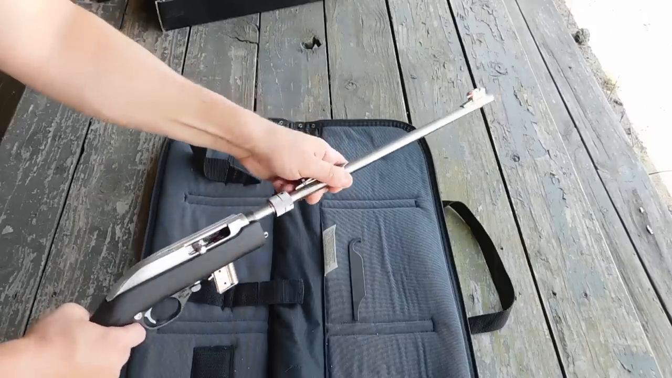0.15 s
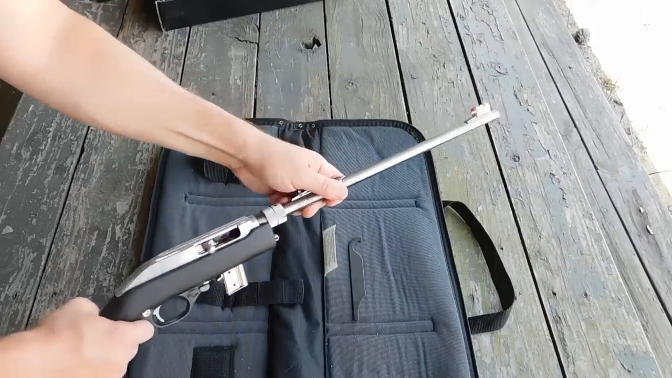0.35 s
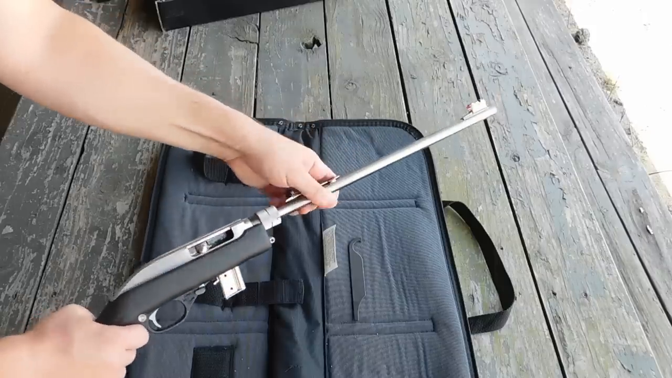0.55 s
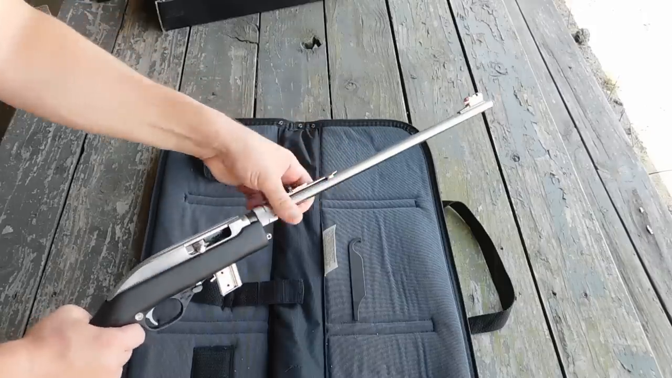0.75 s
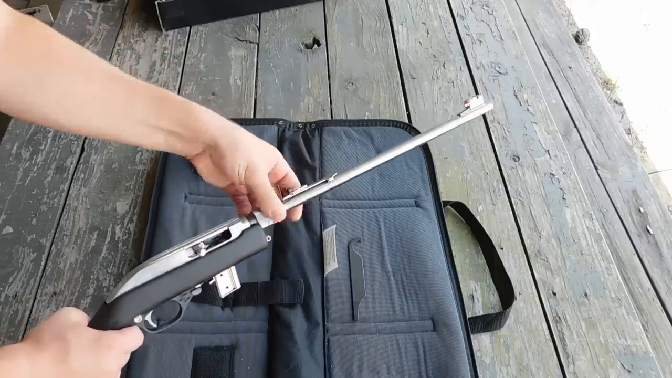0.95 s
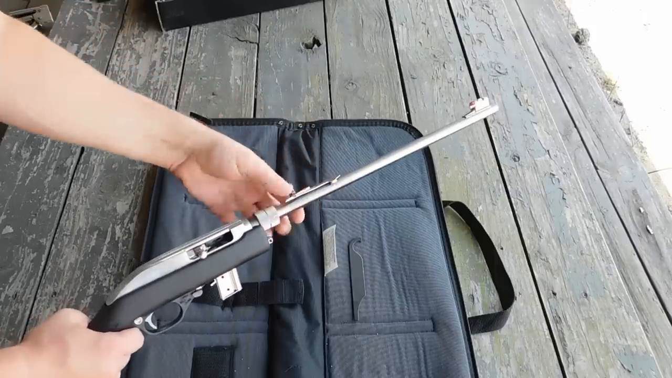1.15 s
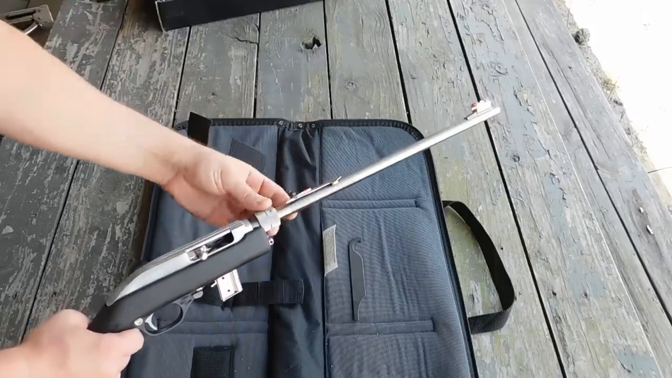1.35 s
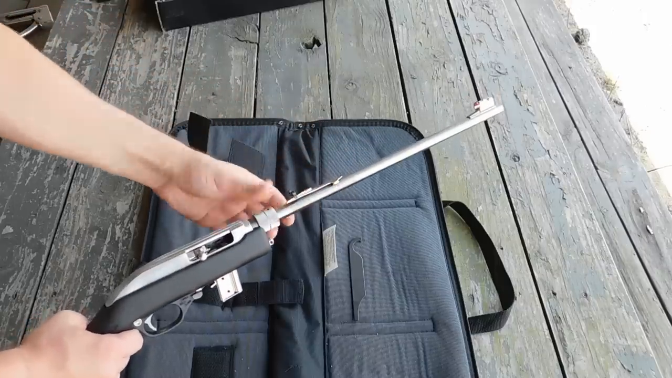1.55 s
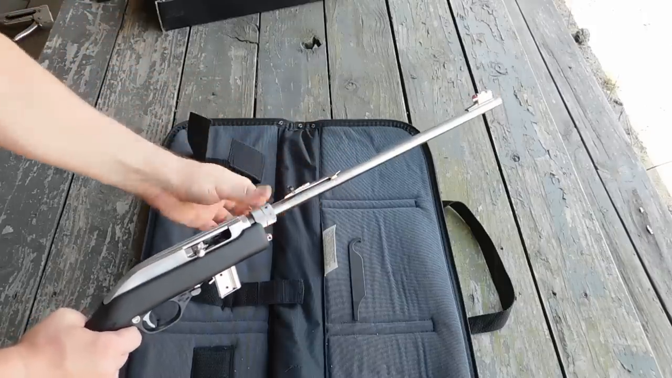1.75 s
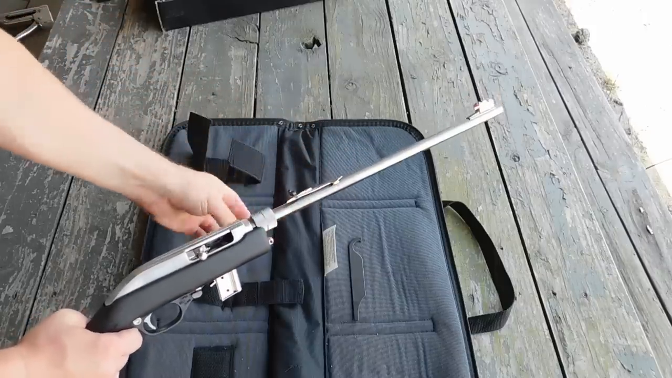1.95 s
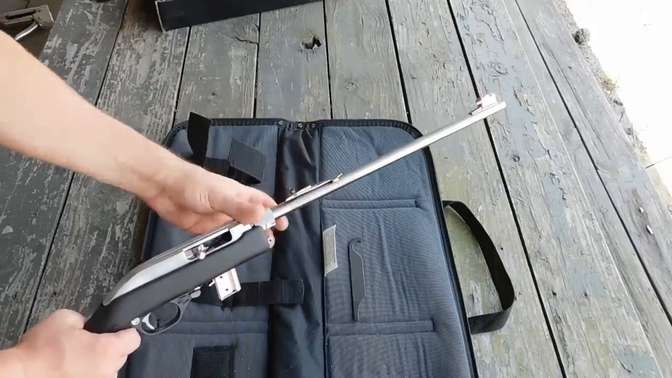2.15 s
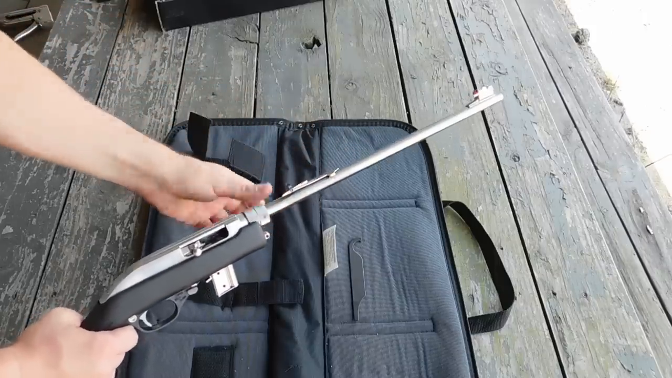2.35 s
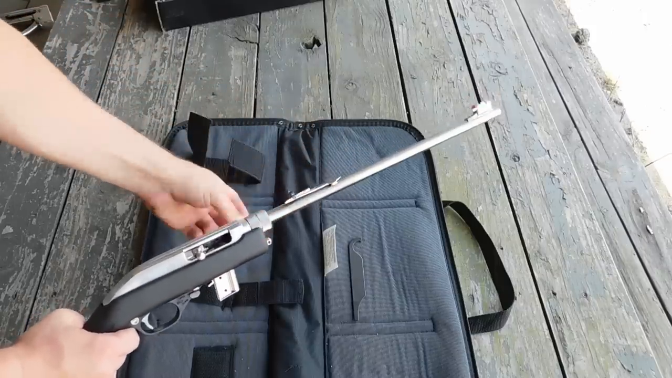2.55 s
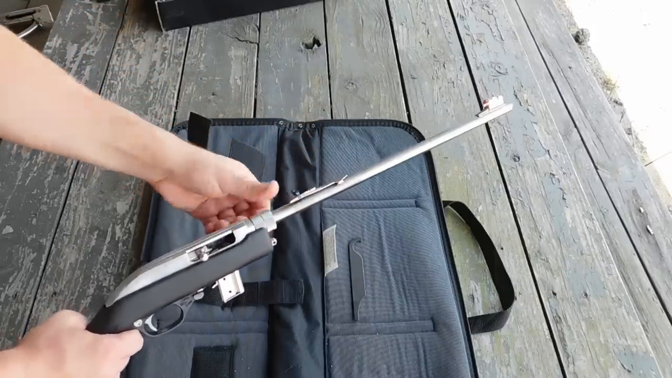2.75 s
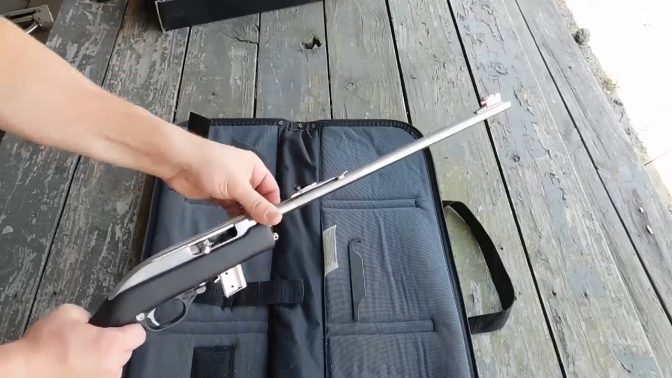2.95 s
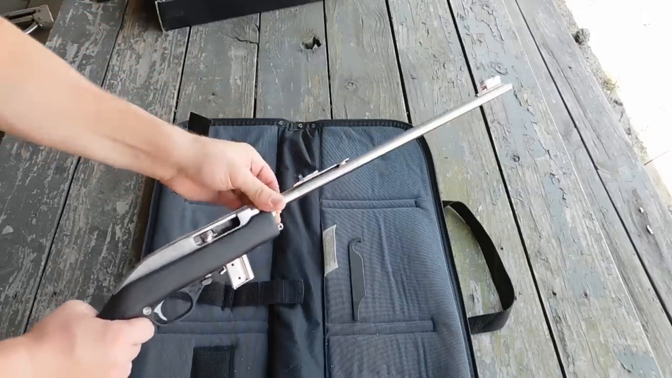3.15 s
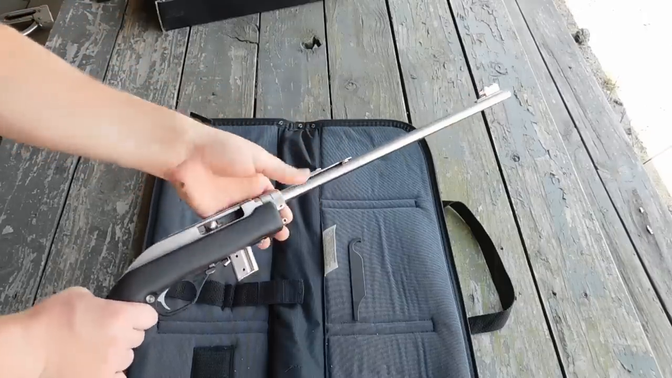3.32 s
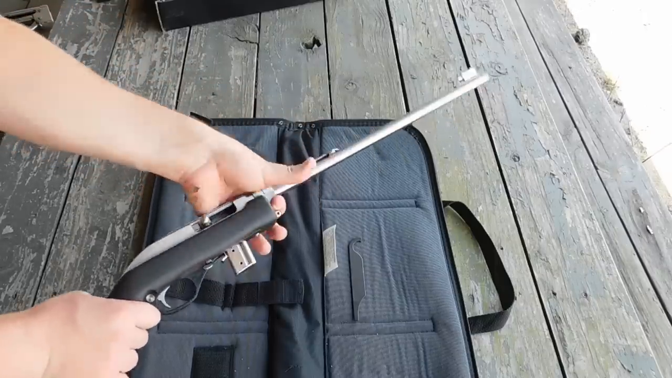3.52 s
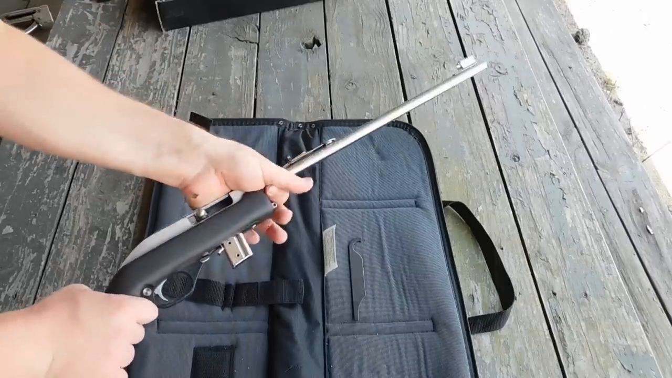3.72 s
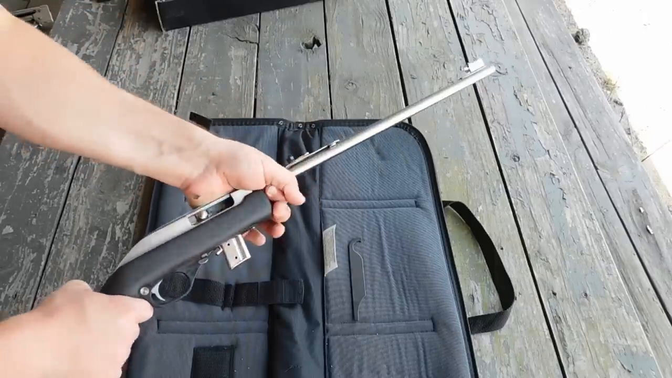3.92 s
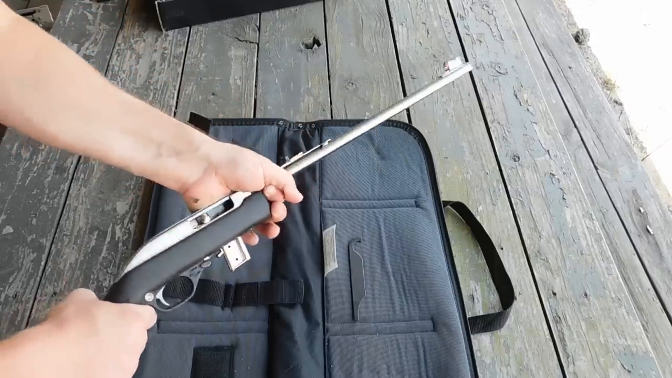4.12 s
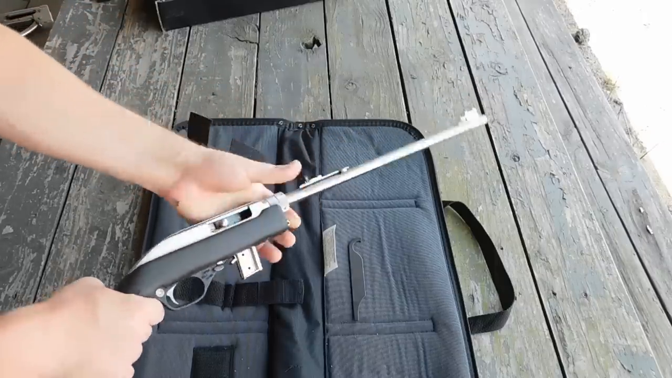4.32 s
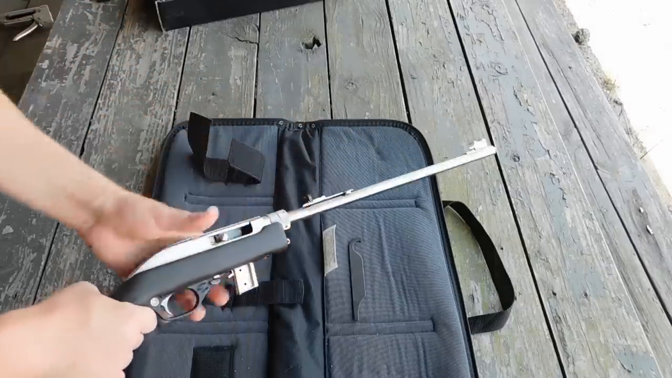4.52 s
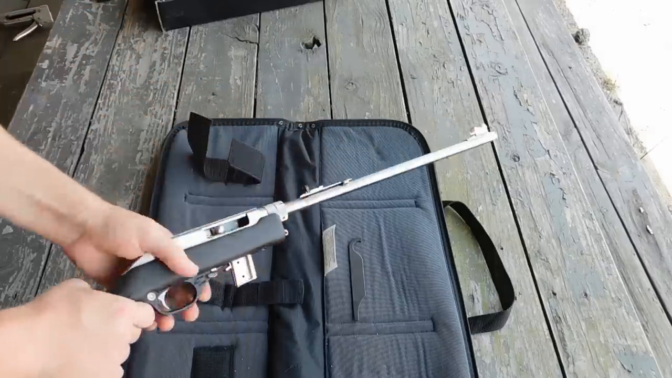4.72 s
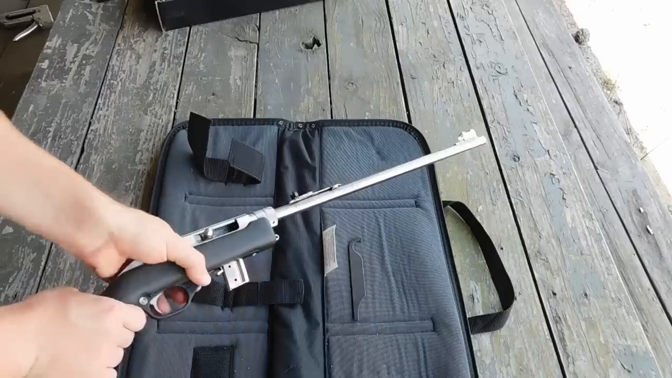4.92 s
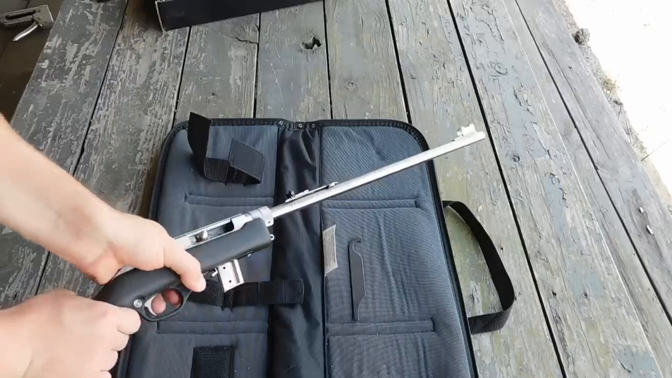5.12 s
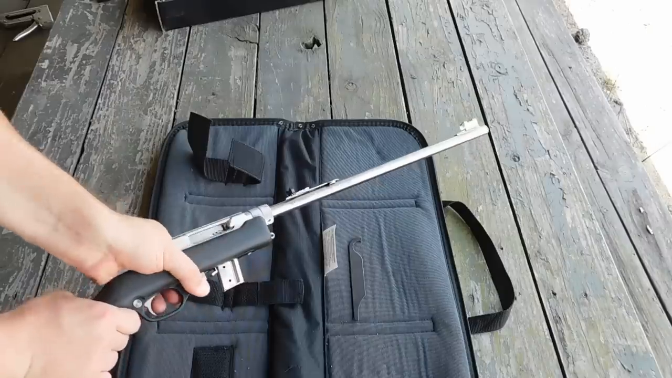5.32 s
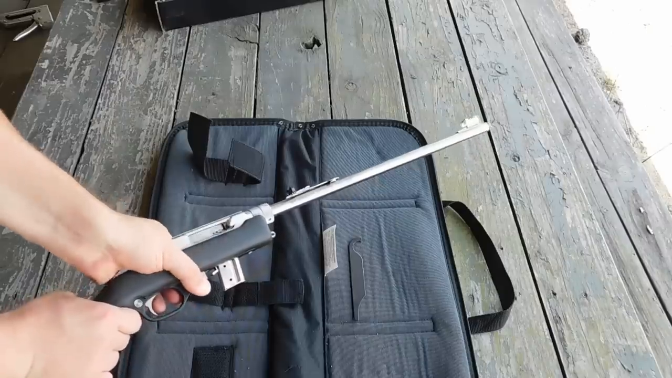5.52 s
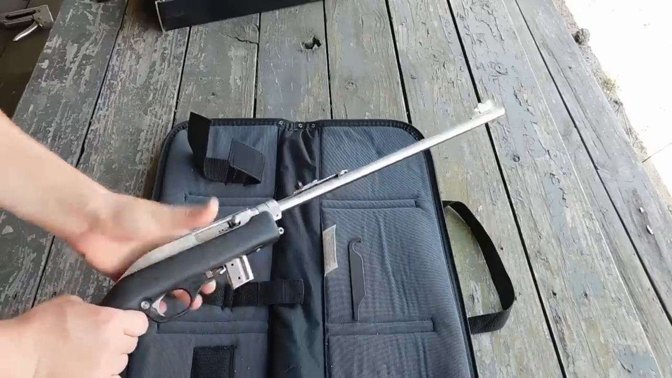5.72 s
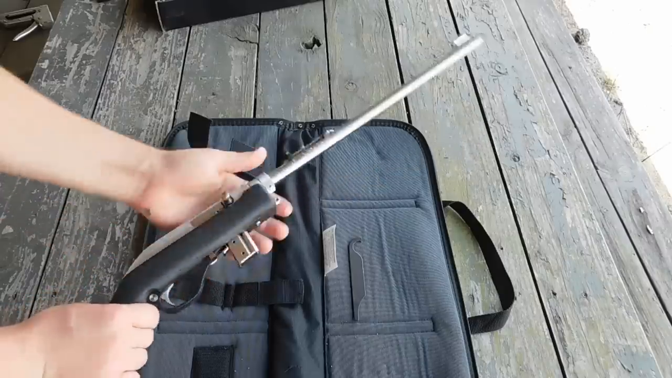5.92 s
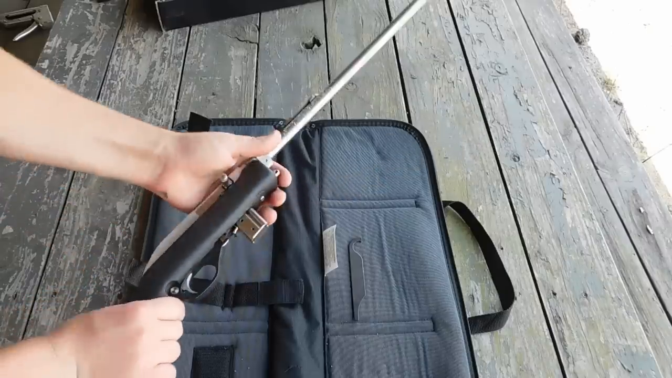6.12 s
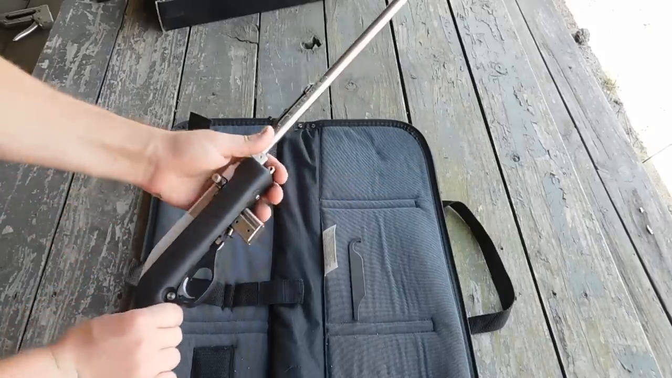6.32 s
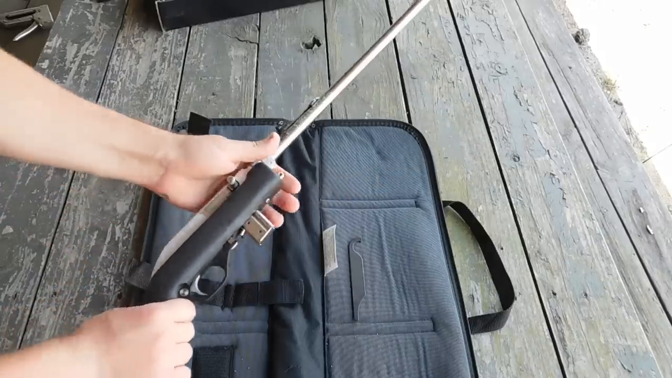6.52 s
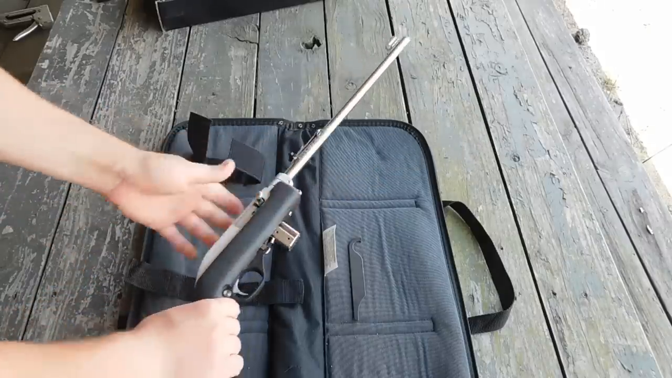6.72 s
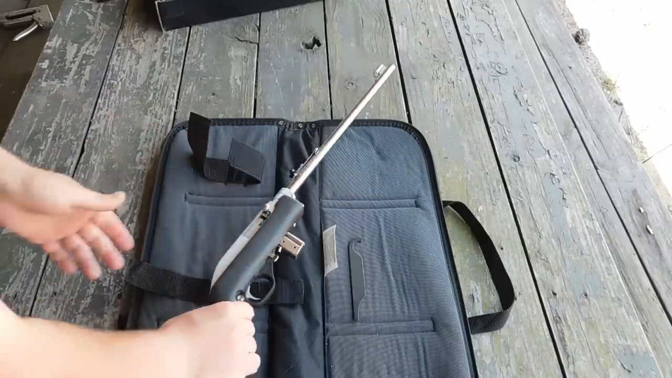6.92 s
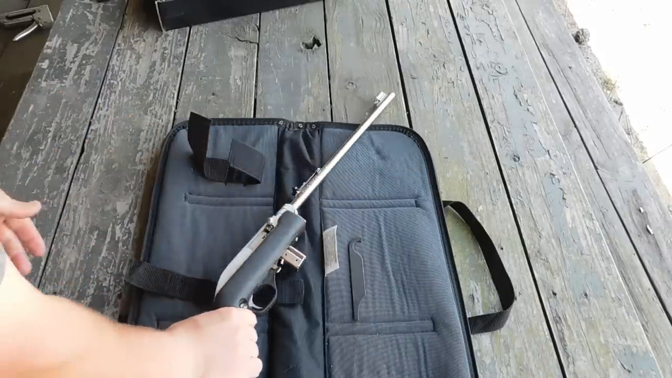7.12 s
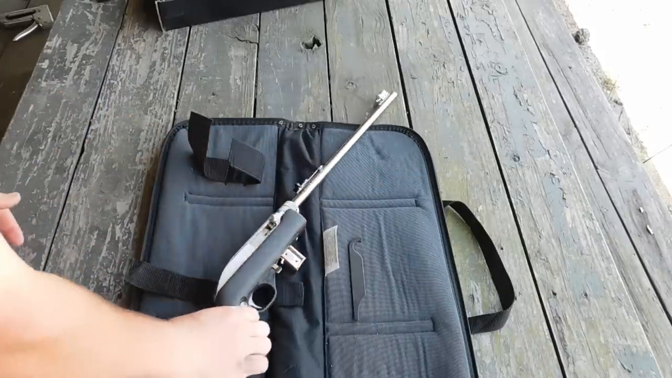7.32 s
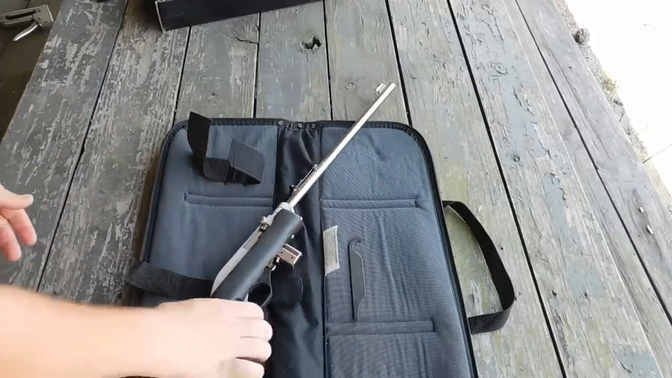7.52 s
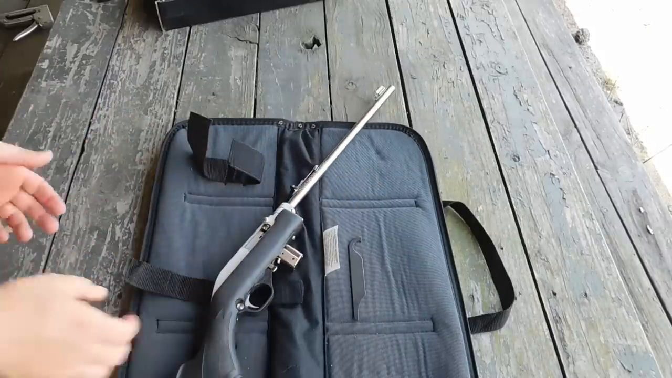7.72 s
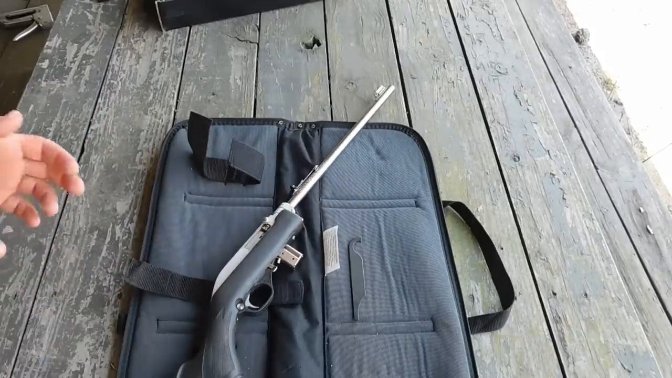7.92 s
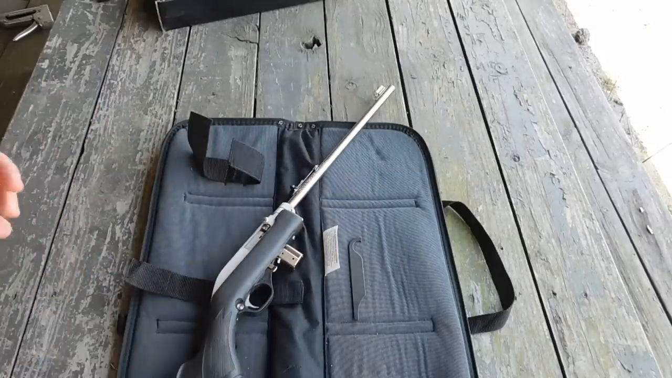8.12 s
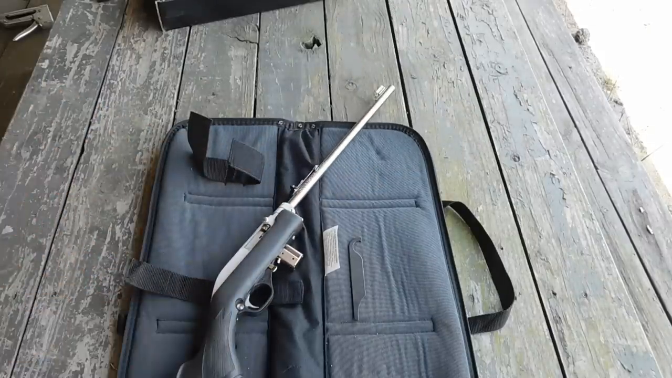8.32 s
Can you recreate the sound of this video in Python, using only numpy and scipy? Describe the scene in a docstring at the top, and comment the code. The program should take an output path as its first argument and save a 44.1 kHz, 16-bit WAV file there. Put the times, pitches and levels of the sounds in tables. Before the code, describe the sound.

A rifle is assembled with two sharp metal clacks, light clicks and scrapes, then laid softly on a padded case outdoors.

```python
"""Assembling a takedown rifle on a wooden porch.

The barrel slides home, its nut is spun and locked, the bolt slams shut, and the rifle is laid on a
padded case. Impacts excite the modes of the steel and of the hollow body; friction makes the sliding
parts and the fabric hiss. The porch reverberates briefly, and an insect trills in the quiet air."""
import sys
import numpy as np
from scipy import signal
from scipy.fft import rfft, irfft, next_fast_len
from scipy.io import wavfile
from scipy.ndimage import uniform_filter1d

SR = 44100
rng = np.random.default_rng(int(sys.argv[2]) if len(sys.argv) > 2 else 0)


def int16_out(signal):
    """Quantize to a 16-bit WAV file."""
    q = np.round(np.clip(np.atleast_2d(signal).T, -1, 1) * 32767)
    wavfile.write(sys.argv[1], SR, q.astype(np.int16))


N = 368676

# spectrum of sliding friction: (f/Hz, relative level/dB)
FRICTION_SPECTRUM = [(150, -20.5), (600, -8.5), (1300, -1), (2300, -2), (3700, -6), (5000, -12),
                     (8000, -20.5), (16000, -22)]
# stereo width of the rifle's sounds: (f/Hz, side over mid/dB)
RIFLE_WIDTH = [(40, -8), (150, -6), (400, -10), (1000, -9), (2500, -7.5), (4000, -3.5), (8000, -2.5),
               (14000, -3)]
# stereo width of the background: (f/Hz, side over mid/dB)
BACKGROUND_WIDTH = [(60, -5), (150, -1), (380, -0.5), (950, 0), (2380, -1), (5980, 0.5), (15000, 0.5)]


def steel_clacks(rebound_s=.0069, ring_q=5.5, hard_above_db=-20, pan_db=2):
    """Impact excitation: a contact and two rebounds drive dense, short modes; the barrel rings on."""
    # steel meeting steel: (t/s, level/dB, resonance f/Hz, resonance over crack/dB,
    # tilt/dB per octave, change per rebound/dB, relative barrel level/dB)
    impacts = [ (0.1217, -39.5, 1700, 0, -4, -6, -22), (0.2881, -6.5, 1695, -6, 1, -13.5, -33),
               (0.314, -24, 3493, -9, 3.5, -9, -5), (0.6591, -40, 3640, -14.5, 1, -9.5, -9),
               (0.6845, -46, 3620, -14, -4, -12, -11), (0.956, -50, 2300, 0.5, -0.5, -15.5, -18),
               (1.054, -42, 1540, 0, 1.5, -1, 1.5), (1.086, -37, 2190, -4, 1, -9.5, -5),
               (1.147, -33, 3800, -4, 2, -16, -5), (1.314, -29.5, 3600, -6, 1, -1.5, -1.5),
               (1.4064, -43, 1460, 11, 3.5, -12, -5), (1.748, -49, 1500, -10, -6, -8, -13.5),
               (1.955, -40.5, 2230, 1, -2.5, -8.5, -15), (2.5132, -50.5, 1340, -1.5, -6.5, -9, -13),
               (2.595, -24, 1430, 4, -1.5, -17.5, -15), (3.2545, -53, 654, -4, -2.5, -1, -25),
               (3.5677, -52, 2220, -8, 1, -10.5, -25), (3.6265, -53, 2150, 5, -2.5, -8, -22),
               (5.236, -54, 2420, -19, 4, -8.5, -13), (5.3698, -6, 3970, -0.5, 4, -6, -26),
               (5.384, -20, 4000, 3.5, 6, -7.5, -24), (5.6582, -42.5, 2550, 0, 2.5, -6.5, -29),
               (6.015, -45.5, 2340, -11, 0.5, -7, -11), (7.124, -48, 2306, -5, -5.5, -14, -30)]
    # spectrum of the crack: (f/Hz, relative level/dB)
    crack_spectrum = [(100, -35.5), (400, -17), (750, -5.5), (1000, -7), (1350, 0.5), (2000, -2),
                      (3000, -5), (3800, -5.5), (4700, -10.5), (6000, -9.5), (9000, -14), (13000, -19.5),
                      (16000, -26)]
    # modes of the barrel: (f/Hz, relative level/dB, T60/s)
    barrel_modes = [(1697, -7.5, 0.086), (1900, -12, .12), (2280, -7, .16), (3620, -1.5, 0.066),
                    (3749, -7, 0.13), (5330, -14.5, .09), (5360, -13, 0.15), (15260, -4.5, .12)]
    out, t, brief = np.zeros((2, N)), np.arange(SR // 4) / SR, np.arange(2048) / SR
    for s, db, ring_hz, ring_db, tilt_db, rebound_db, barrel_db in impacts:
        # a gentler touch lasts longer, so it has less treble
        corner_hz = min(20000 * 2 ** (db / 25.5), .45 * SR)
        softness = signal.butter(2, corner_hz, fs=SR, output="sos")
        for bounce in range(3):
            if bounce == 0 and db > hard_above_db:
                contact = contact_burst(brief, t60=.013)
            else:  # a light touch grazes first
                contact = contact_burst(brief, t60=.031) * (1 - np.exp(-brief / .0007))
            contact = signal.sosfilt(softness, contact)
            crack = unit_blow(colour(contact, crack_spectrum, tilt_db + 1.5 * (bounce > 0)))
            ring = unit_blow(signal.lfilter(*signal.iirpeak(ring_hz, ring_q, fs=SR), crack))
            clack = unit_blow(crack + from_db(ring_db) * ring)
            add(out, s + bounce * rebound_s, from_db(db + bounce * rebound_db) * clack, pan_db)
        barrel = unit_blow(signal.sosfilt(softness, struck_modes(barrel_modes, t, spread_db=1.5)))
        add(out, s, from_db(db + barrel_db) * barrel, pan_db)
    return out


def recoil_spring(shut_s=5.378, level_db=-13, swell_s=.021, action_db=-9.5):
    """Free vibration: after the bolt shuts, spring and loose parts shiver and the action rings."""
    # spectrum of the spring: (f/Hz, relative level/dB)
    spring_spectrum = [(300, -26.5), (650, -25), (870, 1.5), (1200, -5.5), (1800, -3), (3100, -9.5),
                       (3900, -1.5), (5500, -2.5), (7300, 1.5), (8700, -11), (11000, -6.5), (16000, -11.5)]
    # decay of the spring: (f/Hz, T60/s)
    spring_decay = [(850, 0.34), (2000, 0.38), (7000, 0.32), (10000, 0.3), (15000, 0.2)]
    # modes of the action around the bolt: (f/Hz, relative level/dB, T60/s)
    action_modes = [(857, -2, .35), (1045, -3, .4), (1647, -1, .25), (3835, 2, .25), (4391, -1.5, .28),
                    (5365, -8, .3), (6900, -4.5, .25), (7490, -6.5, .3)]
    out, t = np.zeros((2, N)), np.arange(SR) / SR
    swell = 1 - np.exp(-t / swell_s)
    shiver = unit_blow(colour(dense_modes(t, spring_decay), spring_spectrum) * swell)
    ring = unit_blow(struck_modes(action_modes, t, spread_db=1.5))
    add(out, shut_s, from_db(level_db) * (shiver + from_db(action_db) * ring), pan_db=2)
    return out


def body_knocks(shudder_db=3.5, shudder_t60=.16):
    """Soft impact: a band-limited pulse excites only the low modes of the rifle's hollow body."""
    # dull blows: (t/s, level/dB, lowest f/Hz, highest f/Hz, ring over pulse/dB)
    blows = [ (0.021, -56.5, 202, 523, 8), (0.2884, -28, 220, 1166, -20.5), (0.654, -25.5, 488, 856, -6.5),
             (2.0611, -41, 261, 780, -2), (2.687, -35, 240.4, 710.4, -4.5), (5.37, -28, 75, 290, -38),
             (5.3725, -23.5, 501.6, 987, -32.5), (7.31, -38.5, 260, 410, -1), (7.32, -41.5, 60, 190, -5),
             (7.356, -44, 69.6, 200.6, -1), (8.099, -55, 35, 150, -14.5), (8.167, -57, 50, 200, -10)]
    # modes of the body: (f/Hz, relative level/dB, T60/s)
    body_modes = [(149, -5, 0.67), (178, -9, 0.32), (225, -9, .25), (262, -3, .25), (330, -5.5, 0.38),
                  (398, -9, .15), (548, -7, 0.36), (677, -2, .33), (870, -9.5, 0.22)]
    out, t = np.zeros((2, N)), np.arange(SR // 2) / SR
    for s, db, low_hz, high_hz, ring_db in blows:
        softness = signal.butter(4, 1.15 * high_hz, fs=SR, output="sos")
        band = np.vstack([signal.butter(2, [low_hz, high_hz], "band", fs=SR, output="sos"), softness])
        pulse = unit_blow(signal.sosfilt(band, signal.unit_impulse(len(t)) + 1e-18))
        shudder = unit_blow(signal.sosfilt(band, stereo_noise(len(t)) * decay(t, shudder_t60)))
        ring = unit_blow(signal.sosfilt(softness, struck_modes(body_modes, t, spread_db=1)))
        resonance = ring + from_db(shudder_db) * shudder
        add(out, s, from_db(db) * (pulse + from_db(ring_db) * resonance), pan_db=3)
    return out


def sliding_strokes(slips_per_s=700, slip_db=-.5, slip_decay_s=.00043):
    """Sliding friction: tiny random slips roughen a hiss that swells and fades with each stroke."""
    # strokes of steel, threads, palms and straps:
    # (peak t/s, level/dB, rise/s, fall/s, tilt/dB per octave)
    strokes = [ (0.129, -58, .047, 0.1, -3.5), (0.236, -49, 0.0064, 0.023, 0),
               (0.286, -36.5, .019, 0.0036, 0.5), (1.065, -53.5, .09, 0.11, -2),
               (1.313, -41, 0.0036, 0.018, 4), (1.450, -49, 0.078, 0.052, -2),
               (1.710, -53.5, 0.028, 0.057, -1), (2.000, -55, 0.037, 0.072, -0.5),
               (2.273, -47.5, 0.014, 0.013, -.5), (2.290, -57, 0.051, .12, -2),
               (2.592, -39, .017, 0.015, -.5), (3.590, -59.5, .028, 0.047, 0.5),
               (4.020, -65, 0.095, 0.089, 1.5), (4.810, -60, 0.098, 0.26, -.5),
               (5.368, -26, .012, 0.012, 1), (5.655, -55, .02, 0.022, -2.5),
               (7.434, -55, 0.018, 0.029, -1.5), (7.500, -55.5, .012, .025, 3),
               (7.604, -57, 0.013, 0.031, 3), (7.697, -55.5, .008, .014, 4.5)]
    out = np.zeros((2, N))
    for s, db, rise, fall, tilt_db in strokes:
        start = max(s - 2 * rise, 0)
        t = start - s + np.arange(SR * 3 // 4) / SR
        slips = (rng.random(len(t)) < slips_per_s / SR) * rng.exponential(1, len(t))
        roughness = signal.lfilter([1], [1, -np.exp(-1 / (slip_decay_s * SR))], slips + 1e-18)
        grip = 1 + from_db(slip_db) * roughness
        rub = unit_rms(colour(stereo_noise(len(t)) * grip, FRICTION_SPECTRUM, tilt_db))
        envelope = np.exp(-np.abs(t / np.where(t < 0, rise, fall)) ** 1.3)
        add(out, start, from_db(db) * rub * envelope)
    return out


def narrow_tones():
    """Resonance: noise drives narrow tones that swell and die."""
    # squeaks, a high steel ping and the body's low hum: (t/s, level/dB, f/Hz, bandwidth/Hz, rise/s)
    tones = [ (0.258, -36.5, 3610, 198, 0.0051), (0.269, -39, 5410, 250, 0.004),
             (0.302, -30, 15260, 120, .007), (1.660, -63.5, 154.4, 30.2, 0.042),
             (1.930, -59.5, 153.4, 29.8, 0.22), (2.628, -55, 1298, 205, 0.011),
             (3.420, -59, 2160, 200.4, .005), (3.625, -62, 2160, 199.5, .01),
             (4.775, -56.5, 1176, 90, 0.026)]
    out, t = np.zeros((2, N)), np.arange(SR // 4) / SR
    for s, db, hz, width_hz, rise in tones:
        resonator = signal.iirpeak(hz, hz / width_hz, fs=SR)
        tone = unit_rms(signal.lfilter(*resonator, stereo_noise(len(t))))
        add(out, s, from_db(db) * tone * t / rise * np.exp(1 - t / rise))
    return out


def padding_drag(onset_s=.026, weave_db=3.5, grain_db=1.5, catch_db=2.2):
    """Friction on fabric: fine grain and slower catches modulate a rub and the hiss of the weave."""
    # the rifle dragging over the case: (t/s, rub level/dB, hiss level before weave_db/dB)
    drag = [(7.13, -56, -71), (7.184, -63, -69.5), (7.444, -54, -66), (7.708, -65.5, -71),
            (7.738, -71.5, -75), (7.92, -72, -78), (8.034, -79.5, -80), (8.332, -60, -68.5),
            (8.36, -66, -64.5)]
    # spectrum of the weave's hiss: (f/Hz, relative level/dB)
    weave_spectrum = [(2000, -24), (5000, -0.5), (9000, -1), (16000, 0)]
    s, rub_db, hiss_db = np.transpose(drag)
    out, start = np.zeros((2, N)), s[0] - onset_s
    t = start + np.arange(SR * 3 // 2) / SR
    grain = unit_rms(uniform_filter1d(rng.standard_normal(len(t)), size=90))
    catches = unit_rms(uniform_filter1d(rng.standard_normal(len(t)), size=1100))
    texture = from_db(grain_db * grain + catch_db * catches)
    rub = unit_rms(colour(stereo_noise(len(t)) * texture, FRICTION_SPECTRUM, tilt_db=-2))
    rub *= from_db(np.interp(t, s, rub_db))
    hiss = unit_rms(colour(stereo_noise(len(t)) * texture, weave_spectrum))
    hiss *= from_db(weave_db + np.interp(t, s, hiss_db))
    add(out, start, np.minimum((t - start) / onset_s, 1) * (rub + hiss))
    return out


def porch(x, echo_s=.021, echo_db=-11, build_s=.0048):
    """Reverberation: convolution with one distinct reflection and a short diffuse tail."""
    # reverberation time: (f/Hz, T60/s)
    porch_decay = [(100, 0.25), (600, 0.45), (1500, 0.43), (4000, 0.3968), (8000, 0.29), (15000, 0.36)]
    # colour of the reflections: (f/Hz, gain/dB)
    porch_spectrum = [(100, -6), (300, -1.5), (700, 3), (1500, -3), (4000, -3.5), (9000, 3), (16000, -5)]
    t = np.arange(SR * 3 // 4) / SR
    build_up = 1 - np.exp(-t / build_s)
    response = unit_rms(dense_modes(t, porch_decay) * build_up) / np.sqrt(len(t))
    response[:, round(echo_s * SR)] += from_db(echo_db)
    return signal.fftconvolve(x, colour(response, porch_spectrum), axes=1)[:, :N]


def insect(trill_hz=29.3, waver_hz=.54, depth=.62, floor_db=-81.5, pan_db=-3):
    """Amplitude modulation: slightly uneven wing strokes chop a high, noisy resonance into a trill."""
    # swells of the trill: (start t/s, duration/s, level/dB)
    phrases = [(-.3, 1.35, -65.5), (1.403, 0.74, -74.5), (2.9, 1.73, -64.5), (4.547, 0.6, -65),
               (6.9, 1.54, -71.5)]
    # spectrum of the wings: (f/Hz, relative level/dB)
    wing_spectrum = [(6000, -28), (8500, -11.5), (10500, -5), (11600, 1.5), (13000, -5), (14500, -7),
                     (16000, -11)]
    t = np.arange(N) / SR
    level = from_db(floor_db)
    for start, length, db in phrases:
        level = level + from_db(db) * np.sin(np.pi * np.clip((t - start) / length, 0, 1))
    pace_hz = trill_hz + waver_hz * signal.resample(rng.standard_normal(24), N)
    wings = 1 + depth * np.sin(2 * np.pi * np.cumsum(pace_hz) / SR)
    trill = unit_rms(colour(stereo_noise(N, BACKGROUND_WIDTH), wing_spectrum) * wings)
    return pan(level * trill, pan_db)


def air_and_handling(air_db=-60, rumble_gain_db=4):
    """Coloured noise: a steady far hiss, and the low rumble of handling that comes and goes."""
    # spectrum of the hiss: (f/Hz, relative level/dB)
    air_spectrum = [(25, -8.5), (70, -12), (164, -20), (350, -18), (650, -15.5), (1300, -16), (2600, -20.5),
                    (3700, -27.5), (6000, -33), (8000, -33.5), (11000, -31), (15500, -38.5)]
    # spectrum of the handling rumble: (f/Hz, relative level/dB)
    rumble_spectrum = [(15, 2.5), (35, 1), (70, -3), (150, -10), (230, -23.5), (500, -43)]
    # rumble as the hands move: (t/s, level before rumble_gain_db/dB)
    rumble_levels = [(0.0, -66.5), (0.56, -77), (0.86, -66.5), (1.77, -75.5), (1.95, -72.5), (2.12, -63),
                     (3.86, -73.5), (4.73, -65.5), (5.14, -73.5), (5.54, -67), (6.05, -82.5), (6.7, -72),
                     (7.06, -78), (7.47, -63), (7.59, -71.5), (8.36, -67.5)]
    air = unit_rms(colour(stereo_noise(N, BACKGROUND_WIDTH), air_spectrum))
    rumble = unit_rms(colour(stereo_noise(N, BACKGROUND_WIDTH), rumble_spectrum))
    rumble_db = rumble_gain_db + np.interp(np.arange(N) / SR, *np.transpose(rumble_levels))
    return from_db(air_db) * air + from_db(rumble_db) * rumble


def struck_modes(table, t, spread_db):
    """Modal superposition: damped sinusoids, each with a new strength for every blow and side."""
    out = 0
    for hz, db, t60 in table:
        strength = from_db(db + spread_db * rng.standard_normal((2, 1)))
        out = out + strength * np.sin(2 * np.pi * hz * t) * decay(t, t60)
    return out


def dense_modes(t, t60s):
    """Modal overlap: close modes merge into noise, each half octave dying at its own rate."""
    edges = np.geomspace(40, 18000, 19)
    white, out = (stereo_noise(len(t)), stereo_noise(len(t))), 0
    for k, (low, high) in enumerate(zip(edges, edges[1:])):
        band = signal.sosfilt(signal.butter(2, [low, high], "band", fs=SR, output="sos"), white[k % 2])
        out = out + band * decay(t, at_hz(t60s, np.sqrt(low * high)))
    return out


def contact_burst(t, t60, smooth_hz=500):
    """Broadband excitation: a dying burst of noise, whitened to spread its energy evenly."""
    spectrum = rfft(rng.standard_normal((2, len(t))) * decay(t, t60), 2 * len(t))
    power = uniform_filter1d(np.abs(spectrum) ** 2, size=int(smooth_hz * 2 * len(t) / SR), axis=1)
    return widen(irfft(spectrum / np.sqrt(power)))[:, :len(t)]


def colour(x, spectrum, tilt_db=0):
    """Minimum-phase filtering to a spectrum, tilted by tilt_db per octave about 2 kHz."""
    size = 2 * next_fast_len(x.shape[-1])
    hz = np.fft.rfftfreq(size, 1 / SR)
    gain_db = at_hz(spectrum, hz) + tilt_db * np.log2(np.maximum(hz, 250) / 2000)
    cepstrum = irfft(np.log(from_db(gain_db)))
    # folding the cepstrum onto positive time makes the filter causal
    cepstrum[1:size // 2] *= 2
    cepstrum[size // 2 + 1:] = 0
    return irfft(rfft(x, size) * np.exp(rfft(cepstrum)))[..., :x.shape[-1]]


def widen(pair, widths=RIFLE_WIDTH):
    """Mid-side mixing: two independent noises become a partly coherent left and right."""
    size = pair.shape[-1]
    mid, side = rfft(pair)
    width = from_db(at_hz(widths, np.fft.rfftfreq(size, 1 / SR)))
    return irfft((mid + width * side * [[1], [-1]]) / np.sqrt(1 + width ** 2), size)


def stereo_noise(size, widths=RIFLE_WIDTH):
    """Partly coherent white noise."""
    return widen(rng.standard_normal((2, size)), widths)


def from_db(db):
    """Decibels to amplitude ratio."""
    return 10 ** (np.asarray(db) / 20)


def at_hz(points, hz):
    """Interpolation on a log-frequency axis."""
    known, values = np.transpose(points)
    return np.interp(np.log(np.maximum(hz, 1)), np.log(known), values)


def unit_rms(x):
    """Power normalisation to rms 1."""
    return x / np.sqrt(np.mean(x ** 2) + 1e-20)


def unit_blow(x):
    """Energy normalisation to that of 5 ms at rms 1."""
    return unit_rms(x) * np.sqrt(.005 * SR / x.shape[-1])


def decay(t, t60):
    """Exponential damping, 60 dB in t60 seconds."""
    return np.exp(-np.log(1000) * t / t60)


def pan(sound, pan_db):
    """Level difference, left over right."""
    return sound * from_db([[pan_db / 2], [-pan_db / 2]])


def add(out, s, sound, pan_db=0):
    """Superposition of a sound starting at s seconds."""
    start = max(round(s * SR), 0)
    part = sound[..., :N - start]
    out[:, start:start + part.shape[-1]] += pan(part, pan_db)


def scene(steel_send_db=-12.5, knock_send_db=-12):
    """Superposition of the rifle, its reflections, the insect, the air and the handling rumble."""
    steel = steel_clacks() + sliding_strokes() + narrow_tones()
    knocks = body_knocks()
    reflections = porch(from_db(steel_send_db) * steel + from_db(knock_send_db) * knocks)
    rifle = steel + knocks + recoil_spring() + padding_drag()
    return rifle + reflections + insect() + air_and_handling()


def record(dry, cutoff_hz=15900):
    """Soft saturation flattens the hardest peaks; a steep low-pass cuts the top."""
    saturated = dry / (1 + dry ** 4) ** (1 / 4)
    return signal.sosfilt(signal.ellip(10, .1, 80, cutoff_hz, fs=SR, output="sos"), saturated)


dry = scene()
out = record(dry)
int16_out(out)
```